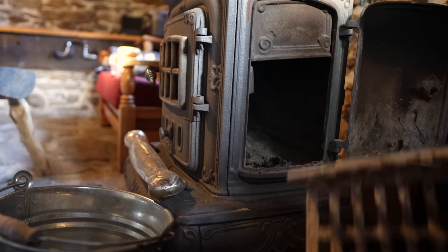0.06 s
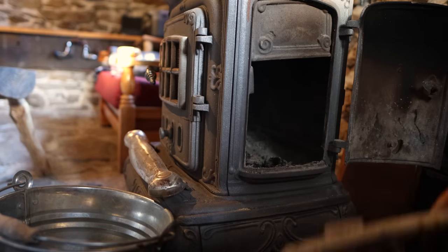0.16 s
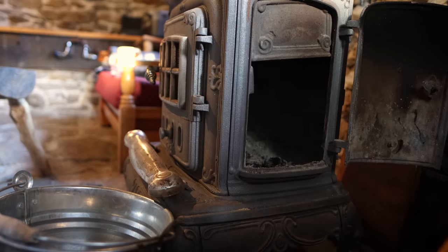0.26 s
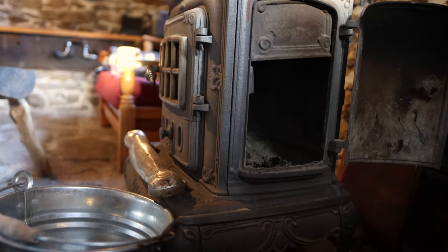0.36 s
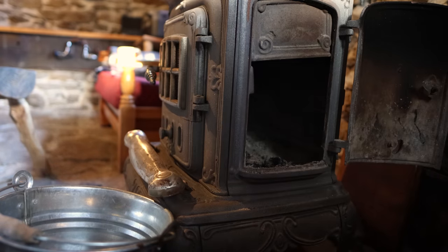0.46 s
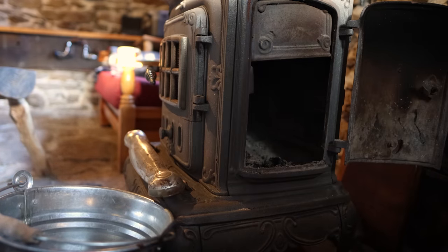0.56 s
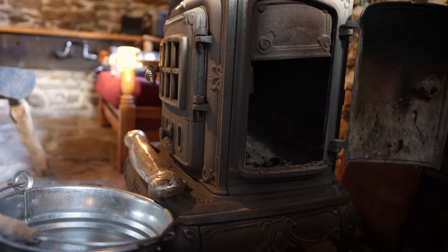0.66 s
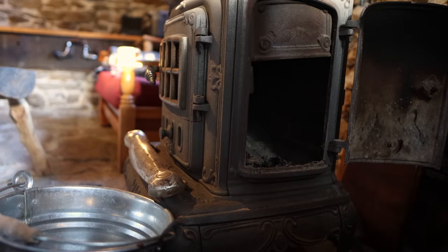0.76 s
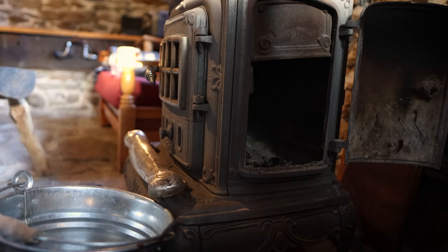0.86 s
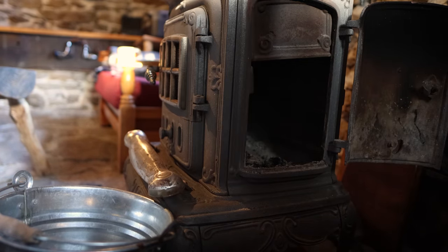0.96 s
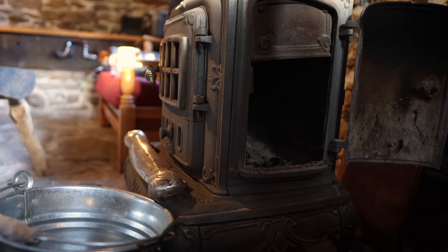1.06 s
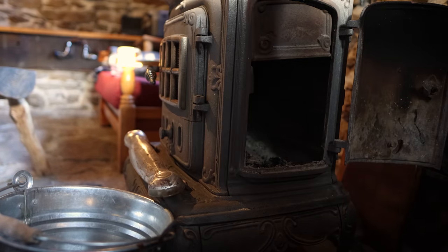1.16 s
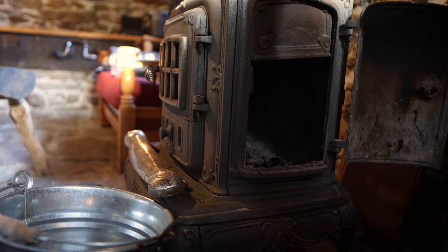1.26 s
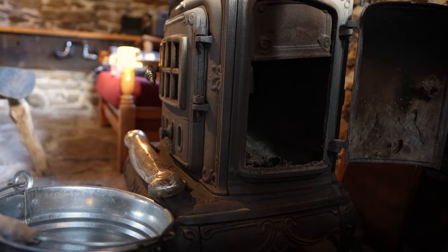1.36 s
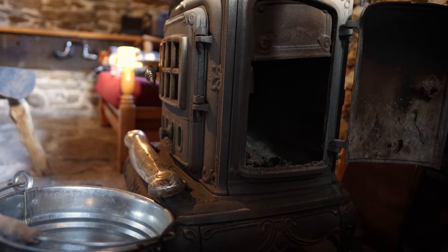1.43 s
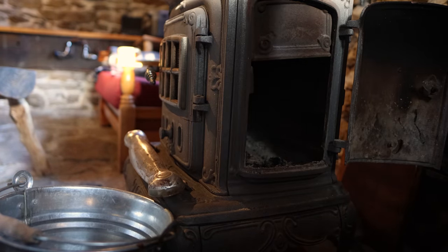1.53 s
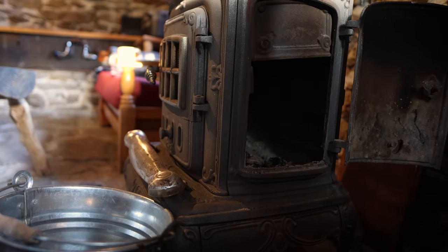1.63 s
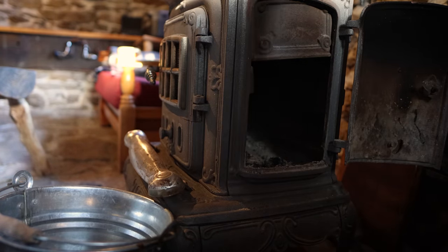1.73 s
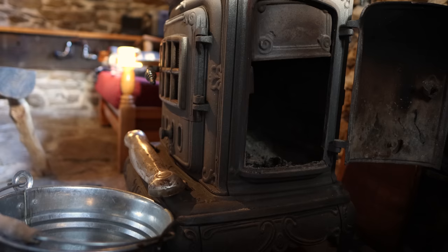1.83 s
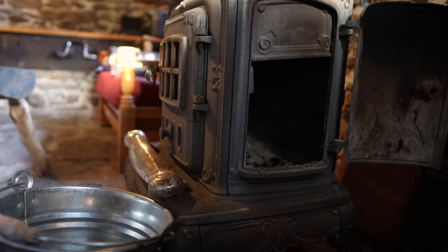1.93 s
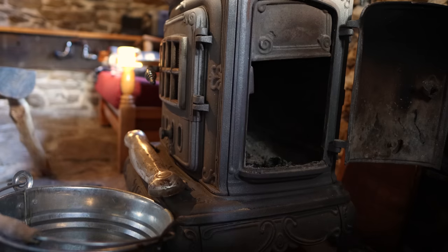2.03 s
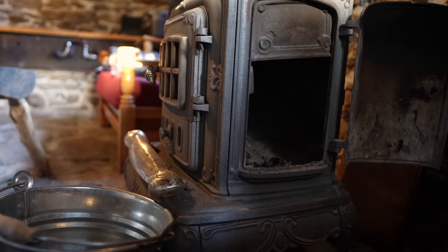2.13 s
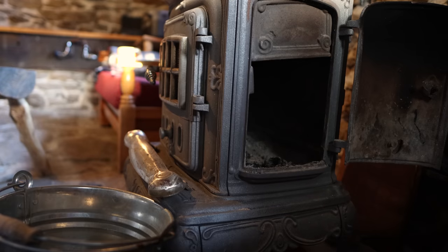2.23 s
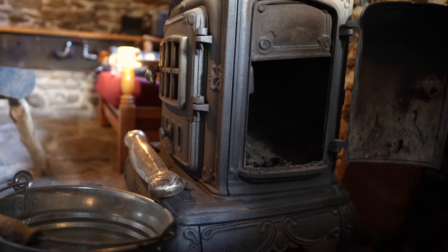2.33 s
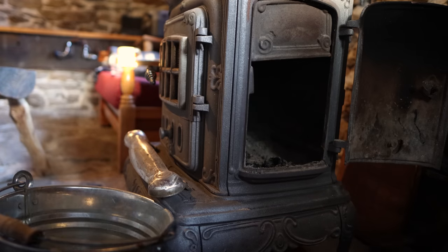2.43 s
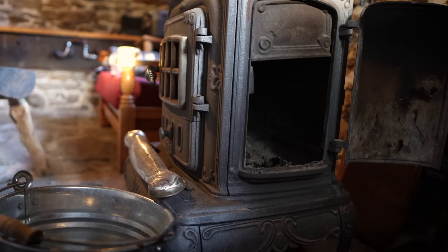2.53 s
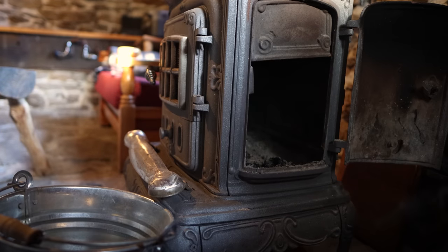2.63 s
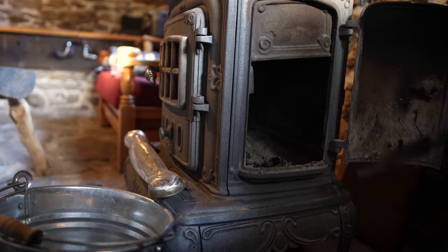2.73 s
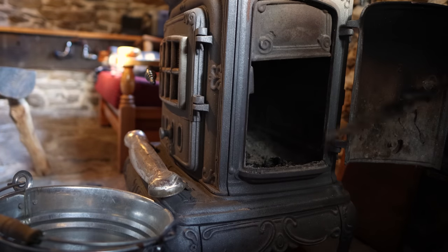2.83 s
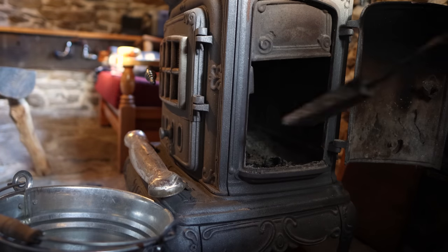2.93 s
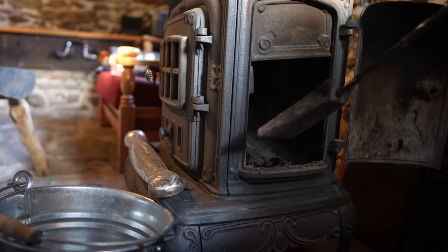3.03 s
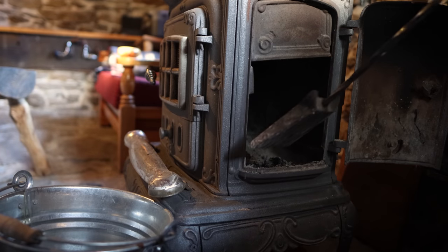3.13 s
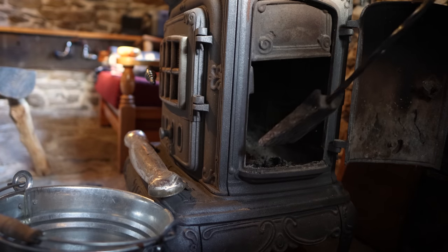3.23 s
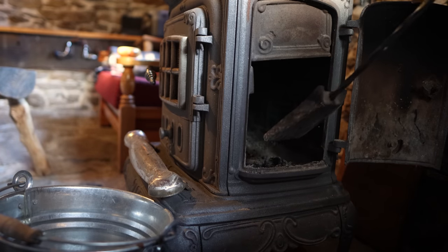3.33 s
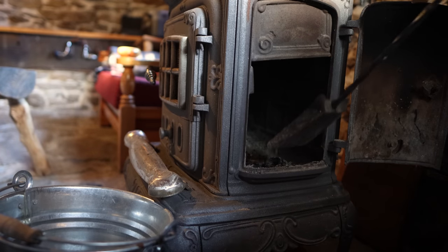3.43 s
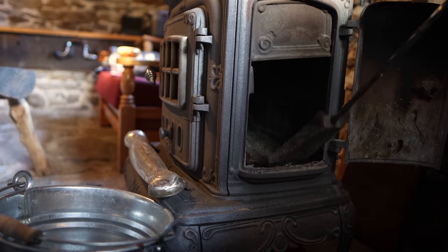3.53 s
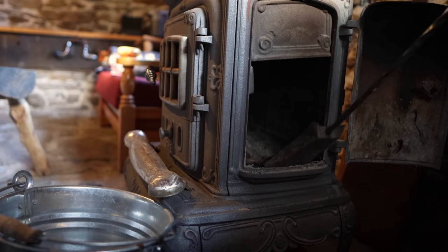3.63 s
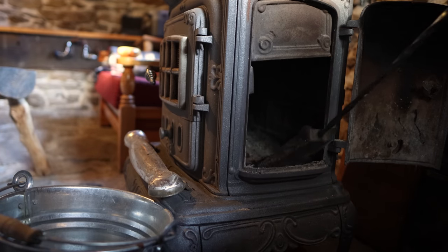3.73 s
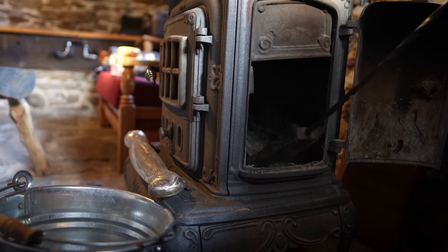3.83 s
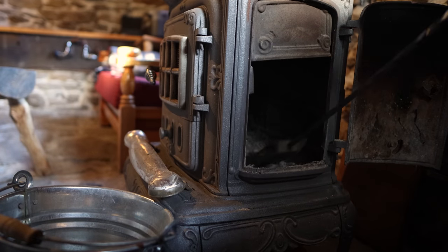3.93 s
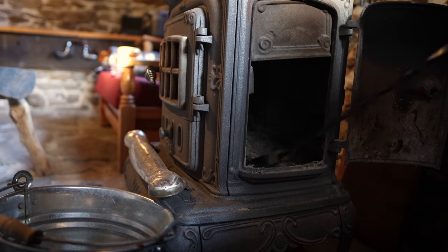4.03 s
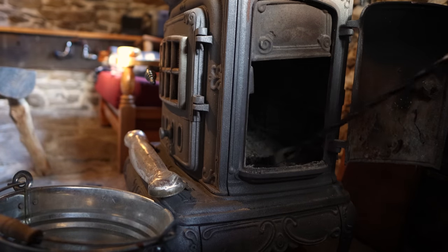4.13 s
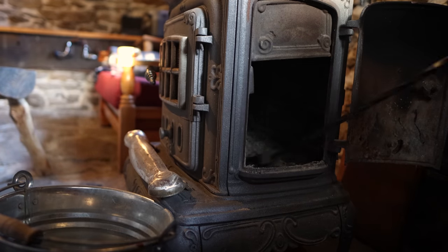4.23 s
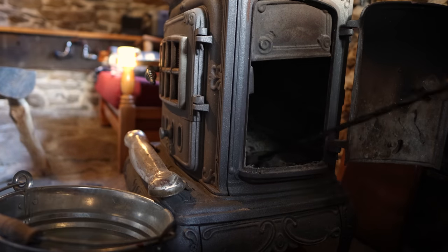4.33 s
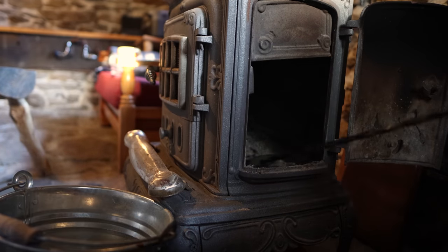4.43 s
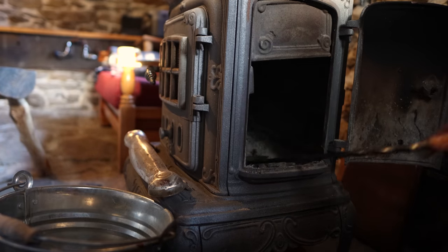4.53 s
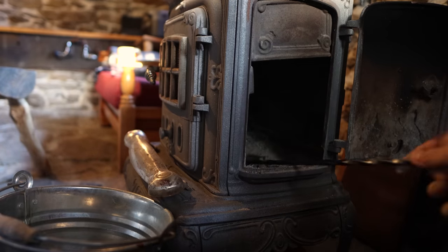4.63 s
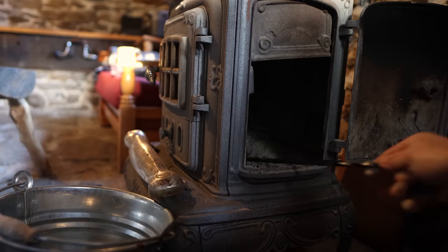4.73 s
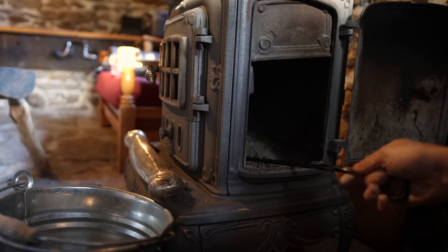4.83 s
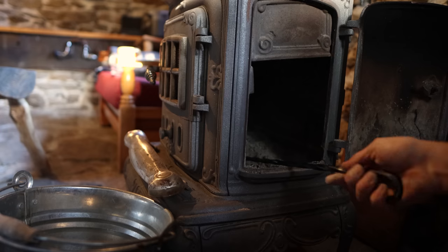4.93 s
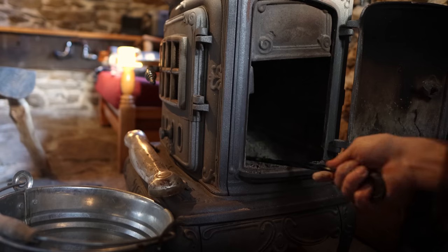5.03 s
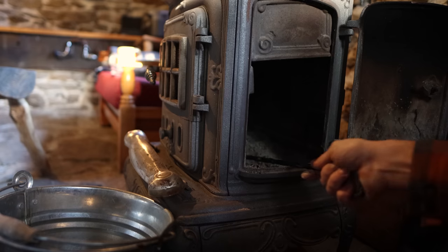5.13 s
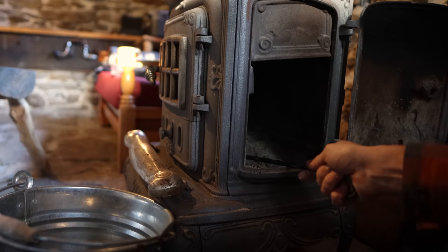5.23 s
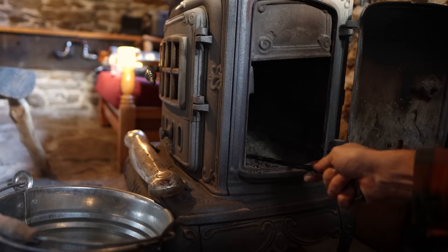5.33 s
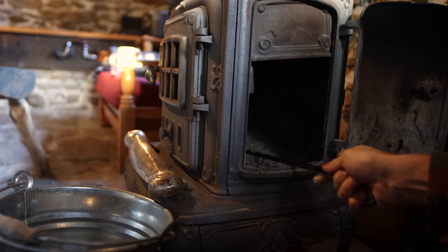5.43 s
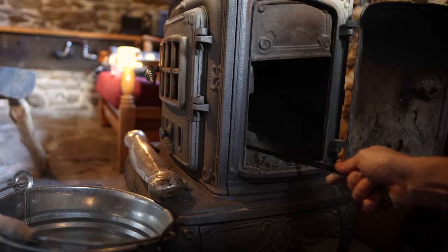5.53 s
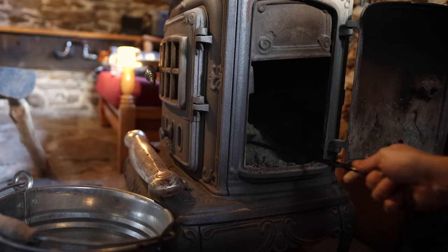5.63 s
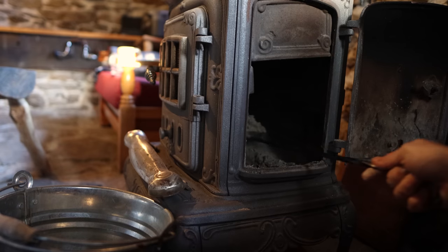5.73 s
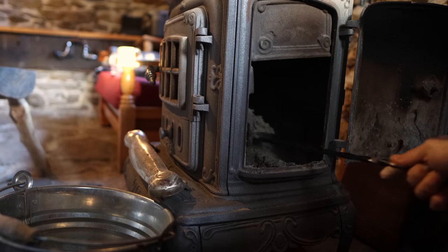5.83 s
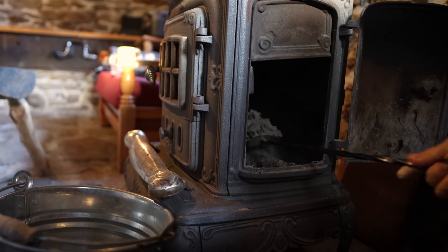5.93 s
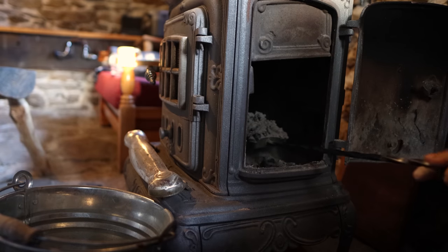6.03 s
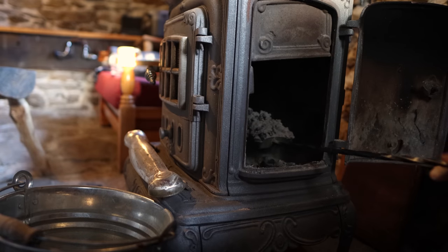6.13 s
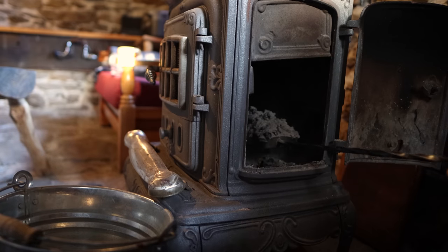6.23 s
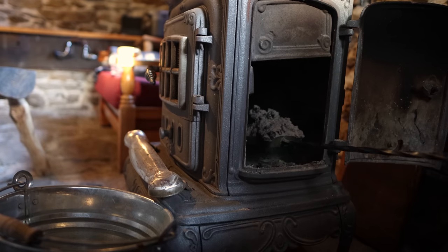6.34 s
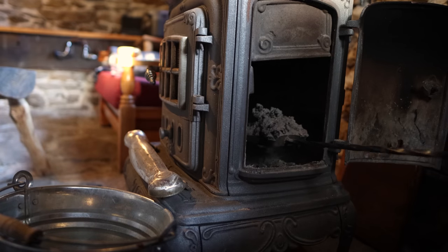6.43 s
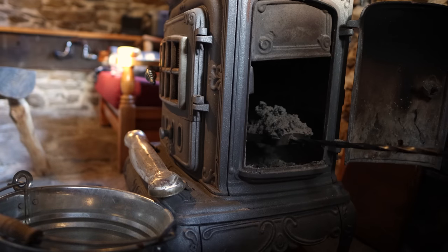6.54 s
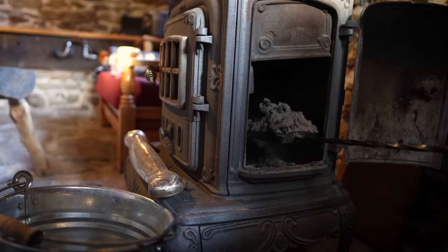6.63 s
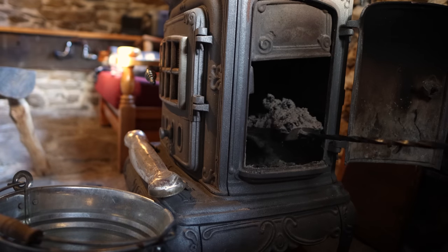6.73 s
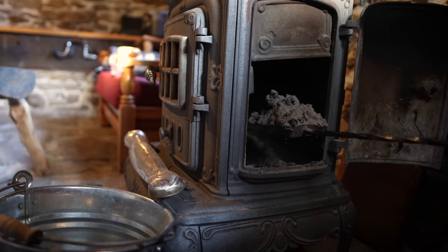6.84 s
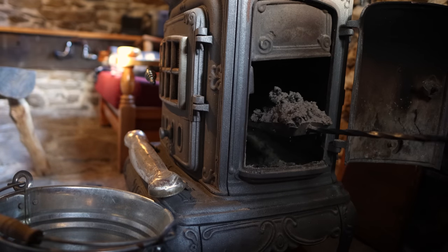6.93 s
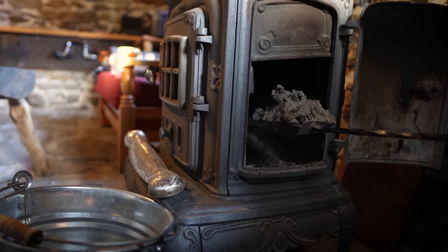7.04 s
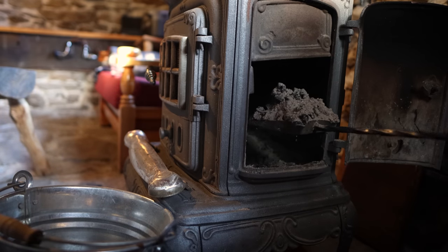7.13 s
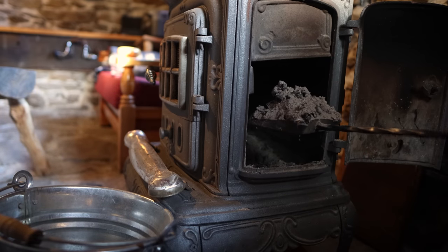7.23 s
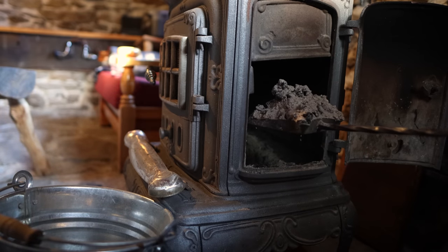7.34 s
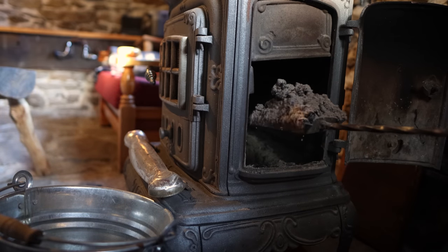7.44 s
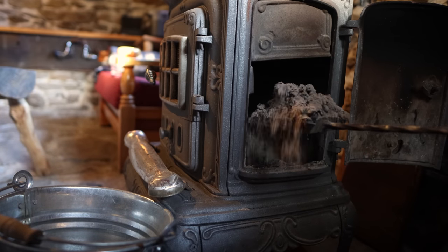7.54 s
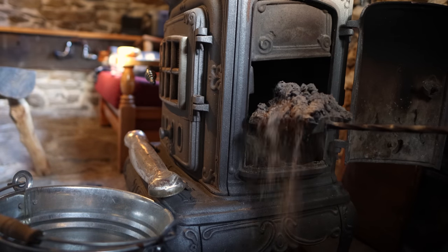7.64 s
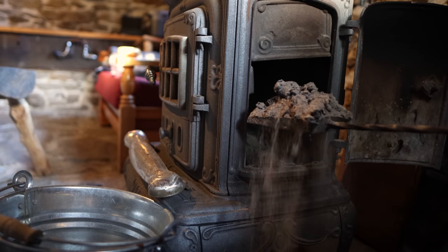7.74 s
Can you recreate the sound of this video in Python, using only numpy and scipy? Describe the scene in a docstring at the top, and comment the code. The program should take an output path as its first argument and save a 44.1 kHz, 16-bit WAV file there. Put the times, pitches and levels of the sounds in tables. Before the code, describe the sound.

Soft rustling in a quiet cabin, then an iron grate drags and rattles down onto a stone hearth. A steel shovel jangles against fire irons with a bright clang that rings briefly. It clacks into a cast-iron stove, scrapes through gritty ash in several short hollow pushes, bumps the iron, then lifts out almost silently until one last dull clunk. Close microphone, short room reverberation.

```python
"""Clearing the ash from a stove

The ash is cleared from a cast-iron stove in a small cabin, heard from close by. A grate is set down on the hearth,
and a steel shovel clangs against the fire irons as it is picked up: impacts excite decaying modes.
The shovel knocks into the firebox, scrapes through the ash in several pushes and bumps the door frame on its
way out: random friction slips drive the iron bodies. Room noise and rustling are noise shaped in bands."""
import sys
import numpy as np
from scipy import signal
from scipy.fft import irfft
from scipy.io import wavfile

SR = 44100
rng = np.random.default_rng(int(sys.argv[2]) if len(sys.argv) > 2 else 0)


def output_pcm(signal):
    """Save a mono or channel-first signal as 16-bit PCM at the path in sys.argv[1].

    Samples are clipped to [-1, 1] before scaling.
    """
    pcm = np.clip(np.atleast_2d(signal).T, -1, 1) * 32767
    wavfile.write(sys.argv[1], SR, np.round(pcm).astype(np.int16))


N = 343098
EDGES_HZ = np.geomspace(30, 18000, 25)
BANDS_HZ = np.sqrt(EDGES_HZ[1:] * EDGES_HZ[:-1])

# Colour tables are relative spectra; levels of single events are relative to their later mix gains.
# spectrum of contacts on the hearth: frequency_hz, density_db (per Hz)
HEARTH_COLOUR = [(50, -23), (205, 1), (285, -8.5), (460, 6), (740, -19.5), (1020, -2), (2400, -15),
                 (4600, -12.5), (9000, -35.5), (16000, -54)]
# spectrum of steel on steel: frequency_hz, density_db (per Hz)
CLASH_COLOUR = [(150, -35.5), (1000, -17), (1400, -4), (2100, -10), (2600, -6.5), (3800, -6.5), (5400, -14),
                (9000, -25.5), (16000, -42.5)]
# spectrum of clacks in the stove: frequency_hz, density_db (per Hz)
CLACK_COLOUR = [(80, -5), (180, 1), (310, -5), (430, -20), (650, 3), (1200, 0), (2400, -2.5), (3700, -6.5),
                (5000, -19), (16000, -34)]
# spectrum of crushed ash and cinders: frequency_hz, density_db (per Hz)
ASH_COLOUR = [(3700, 3.5), (5500, 2.5), (16000, -7)]
# modes of the shovel's steel blade: pitch_hz, level_db, t60_s
SHOVEL = [(1295, -3, .25), (1331, -6, 0.26), (1748, 1, 0.24), (1783, -1, 0.3), (1821, 5, .42),
          (2198, -7, .38), (2530, 7, 0.33), (2612, -2, .22), (2829, 3.5, 0.3), (3185, -3.5, 0.32),
          (3394, 1.5, 0.48), (3541, -7, 0.3), (3715, 5.5, .3), (3779, 2.5, 0.27), (4850, 3, .24),
          (4958, -4, 0.33), (5986, -13, .2)]
# modes of the shovel's long shaft: pitch_hz, level_db, t60_s
SHAFT = [(924, -21, 1.6), (1582, -15, 1.8), (2245, -14, .45), (2389, -1, .58), (2766, -5, .48),
         (4757, -19, .5), (5402, -16, .35)]
# bending modes of the shovel's pan, pressed on the ash: pitch_hz, level_db, t60_s
PAN = [(436.3, 6, 0.12), (457, -19.5, 1.0), (467, -2.5, 0.083), (570, -4, 0.033), (987, -11.5, 0.23)]
# modes of the iron firebox: pitch_hz, level_db, t60_s
FIREBOX = [(82.3, -45.5, 2.5), (122.2, -27.5, 3.2), (161.4, -17, 1.42), (183, -6.5, 0.13), (238.5, -6, .1),
           (256, -9, 0.14), (821, -3, 0.055)]
# the blade sliding on under its own weight between pushes: start_s, length_s, pressure_db, bite_db, ash_db
SLIDES = [(3.764, 1.16, -55, -55, -56.5), (4.501, 1.29, -54, -60, -62.5), (5.901, 0.21, -63.5, -71, -72)]
# envelope of the dragged grate and of spilling ash: attack_s, build_up_db_per_s, release_db_per_s
DRAG_SHAPE = (0.016, 12, 220)
# envelope of the shovel sliding on the irons: attack_s, build_up_db_per_s, release_db_per_s
JANGLE_SHAPE = (0.012, 51, 350)


def from_db(db):
    """Level to amplitude: 20 dB is a factor of ten."""
    return 10 ** (np.asarray(db) / 20)


def rms_one(x):
    """Normalise the mean power: scale to rms 1."""
    return x / np.sqrt(np.mean(x ** 2) + 1e-20)


def energy_one(x):
    """Unit-energy impulse response: white noise keeps its power when convolved with it."""
    return x / np.linalg.norm(x)


def at_bands(points):
    """Interpolate a table over logarithmic frequency at the band centres."""
    hz, value = np.transpose(points)
    return np.interp(np.log(BANDS_HZ), np.log(hz), value)


def fade(t60, size):
    """Exponential damping: the amplitude loses 60 dB in t60 seconds."""
    return np.exp(-np.log(1000) * np.arange(size) / SR / np.maximum(t60, 1e-3))


def add(out, s, sound):
    """Superposition: mix a sound in at time s."""
    start = max(round(s * SR), 0)
    out[start:start + len(sound)] += sound[:N - start]


def through(x, response):
    """Linear response of a body or a room, by convolution."""
    return signal.fftconvolve(x, response)[:N]


def noise_bands(size):
    """Band-pass filtering of white noise; neighbouring bands draw on independent noises."""
    white = rng.standard_normal((2, size + SR // 4))
    bands = []
    for k, pair in enumerate(zip(EDGES_HZ, EDGES_HZ[1:])):
        sos = signal.butter(2, pair, "band", fs=SR, output="sos")
        bands.append(signal.sosfilt(sos, white[k % 2])[-size:])   # the filter's onset is left out
    return np.array(bands)


def dense_modes(colour_db, t60, count=600, size=SR // 2):
    """High modal density: many modes at chance pitches follow a colour; rms 1 before onset and decay."""
    places = (np.arange(count) + rng.random(count)) / count
    hz = 50 * (17000 / 50) ** places
    heights = from_db(np.interp(np.log(hz), np.log(BANDS_HZ), colour_db))
    heights = heights * np.sqrt(hz)   # high modes lie further apart
    phasors = rng.standard_normal(count) + 1j * rng.standard_normal(count)
    lines = np.zeros(size // 2 + 1, complex)
    lines[np.round(hz * size / SR).astype(int)] = heights * phasors
    contact = 1 - fade(0.0006, size)   # the surfaces take a moment to meet
    return rms_one(irfft(lines, size)) * contact * fade(t60, size)


def ring(modes, extra_db=0, longest_t60=np.inf, size=2 * SR, swings=False):
    """Modal synthesis: damped sines, shortened by a hand or ash, waxing and waning if the body swings."""
    hz, db, t60 = np.transpose(modes)
    heights = from_db(db + extra_db) * (-1) ** np.arange(len(hz))
    out = np.zeros(size)
    for height, f, t in zip(heights, hz, np.minimum(t60, longest_t60)):
        length = min(size, int(1.4 * t * SR))
        turn = 2 * np.pi * np.arange(length) / SR
        if swings:   # turns each mode towards the listener and away: 3.5 dB, at a chance rate in Hz
            height = height * from_db(3.5 * np.sin(rng.uniform(-5.76, 3.6) * turn))
        out[:length] += height * np.sin(f * turn) * fade(t, length)
    return out


def knock(colour, db, bright_db, t60, crack=1.0, crack_t60=.02, bass_hz=500, treble_hz=5500, peak_hz=None):
    """Hard impact: a brief crack over a dying clack; a sharper contact trades bass for treble."""
    treble = 1 / (1 + (treble_hz / BANDS_HZ) ** 2)
    bass = 1 / (1 + (BANDS_HZ / bass_hz) ** 2)
    colour_db = at_bands(colour) + bright_db * (treble - bass)
    if peak_hz:   # the clack centres on a pitch: 6 dB, 0.28 octaves
        colour_db = colour_db + 6 * np.exp(-(np.log2(BANDS_HZ / peak_hz) / 0.28) ** 2)
    clack = dense_modes(colour_db, t60)
    return from_db(db) * clack * (1 + crack * fade(crack_t60, len(clack)))


def slips(per_s, spread_db, size=N):
    """Stick-slip friction as a random pulse train: chance moments, uneven sizes, rms 1."""
    sizes = from_db(spread_db * np.minimum(rng.exponential(1, size), 4))
    signs = rng.choice([-1, 1], size)
    return rms_one(sizes * signs * (rng.random(size) < per_s / SR))


def favour(modes, contact_hz, focus_db):
    """Contact-point coupling: each mode loses focus_db per octave away from the favoured pitch."""
    return -focus_db * np.abs(np.log2(np.array(modes)[:, 0] / contact_hz))


def wander(per_s, spread_db, size=N):
    """Random modulation: a gain that drifts between chance levels."""
    steps = np.arange(size) / SR * per_s
    return from_db(spread_db * np.interp(steps, np.arange(size), rng.standard_normal(size)))


def cushioned(force, cut_hz):
    """Low-pass filtering by a soft layer: ash under the edge rounds off each slip."""
    sos = signal.butter(2, min(cut_hz, SR / 2 - 10), fs=SR, output="sos")
    return signal.sosfilt(sos, force)


def flexed(x, per_s=22, spread_db=.5):
    """Frequency modulation by uneven playback: changing pressure makes the pan's resonances waver in pitch."""
    position = np.cumsum(wander(per_s, spread_db, len(x)))
    return np.interp(position, np.arange(len(x)), x, right=0)


def stroke(length, shape, spent_db=50):
    """Amplitude envelope of a hand movement: it takes hold, builds up to 1 at its end, then eases off."""
    attack_s, build_db_per_s, release_db_per_s = shape
    t = np.arange(int((length + spent_db / release_db_per_s) * SR)) / SR
    slope_db_per_s = np.where(t < length, build_db_per_s, -release_db_per_s)
    return np.minimum(t / attack_s, 1) * from_db(slope_db_per_s * (t - length))


def strokes(rows, shape):
    """Superposed amplitude envelopes of a series of like movements."""
    out = np.zeros(N)
    for s, length, db in rows:
        add(out, s, from_db(db) * stroke(length, shape))
    return out


def pan_modes(s):
    """Mass loading: from 7.3 s on the pan is lifted with its ash, which lowers its modes."""
    pitch = .91 if s > 7.3 else 1
    return [(hz * pitch, db, t60) for hz, db, t60 in PAN]


def room_noise():
    """Stationary broadband noise: band noises weighted by the colour of the room."""
    # frequency_hz, density_db (per Hz)
    room_colour = [(30, -20), (70, -5), (130, -3), (450, -7.5), (900, -8.5), (1800, -19), (3800, -23.5),
                   (7000, -28.5), (16000, -36)]
    return from_db(-70) * rms_one(from_db(at_bands(room_colour)) @ noise_bands(N))


def rustling():
    """Amplitude-modulated noise: the soft rustle of someone moving about, and from 6.2 s of ash shifting on the
    blade."""
    # rustles: start_s, length_s, level_db
    rustles = [(0, 2.21, -49.5), (2.45, 0.43, -57), (3.0, 0.33, -67.5), (6.2, 2.46, -67)]
    # envelope: attack_s, build_up_db_per_s, release_db_per_s
    rustle_shape = (0.006, 3.9, 77.4)
    # frequency_hz, density_db (per Hz)
    air_colour = [(30, -27.5), (95, -15.5), (131, -8.5), (336, -11.5), (702, -12), (1960, -19.5),
                  (3980, -19.5), (16000, -49.5)]
    noise = rms_one(from_db(at_bands(air_colour)) @ noise_bands(N))
    return strokes(rustles, rustle_shape) * noise


def plate_hum():
    """Free decay of one mode: the hum of the stove's iron plates fades from the start."""
    out = np.zeros(N)
    add(out, 0, ring([(134, -50.5, 2.1)]))
    return out


def grate():
    """Friction, then impacts: the grate slides, touches the hearth bar after bar, drops flat and is nudged."""
    # dragged out and over the stone: start_s, length_s, level_db
    drags = [(0.64, 0.22, -54), (1.0, 0.15, -38), (1.645, 0.045, -36.5)]
    # contacts with the hearth: start_s, level_db, brightness_db, touching_bar_pitch_hz
    hearth_knocks = [(0.983, -25.5, 7.5, 4680), (1.013, -36.5, -5, 6600), (1.030, -22.5, 5, 4060),
                     (1.074, -29, 1, 3980), (1.104, -33, -0.5, 5100), (1.134, -33.5, -2.5, 3700),
                     (1.203, -11.5, 1.5, 4880), (1.268, -32, 1.5, 4100), (1.636, -42, -8.5, 4307)]
    # modes of the cast-iron grate: pitch_hz, level_db, t60_s
    grate_modes = [(980, -2.5, 0.072), (1110, -3, 0.06)]
    friction = strokes(drags, DRAG_SHAPE) * slips(per_s=1500, spread_db=3.0)
    out = through(friction, energy_one(dense_modes(at_bands(HEARTH_COLOUR), t60=0.01)))
    for s, db, bright_db, bar_hz in hearth_knocks:
        modes = grate_modes + [(bar_hz, bright_db - 10, .11)]   # a sharper touch wakes the bar more
        uneven_db = rng.normal(0, 2, len(modes))
        add(out, s, knock(HEARTH_COLOUR, db - 3.5, bright_db, t60=0.19, crack=1.9, crack_t60=.03))
        add(out, s, from_db(db - 2.0) * ring(modes, uneven_db, size=SR // 2))
    return out


def sliding_on_irons():
    """Friction-driven resonance: the shovel brushes and slides over the other irons, which ring along."""
    # light brushes that set the shovel singing: start_s, length_s, level_db
    brushes = [(1.787, .05, -51.5), (3.04, 0.049, -59.5), (3.93, .07, -42)]
    # sliding off its hook and brushing the other irons: start_s, length_s, level_db
    jangles = [(1.975, 0.145, -20), (2.215, 0.026, -25)]
    irons = energy_one(dense_modes(at_bands(CLASH_COLOUR), t60=0.16, count=220))
    blade = energy_one(ring(SHOVEL, longest_t60=0.15, size=len(irons)))
    # a light touch favours the high modes
    high_db = favour(SHOVEL, 4200, focus_db=9.5)
    grazed = energy_one(ring(SHOVEL, high_db, longest_t60=0.23, size=len(irons)))
    chatter = slips(per_s=250, spread_db=5.5)
    out = through(strokes(jangles, JANGLE_SHAPE) * chatter, from_db(-2.0) * irons + from_db(-4.0) * blade)
    return out + through(strokes(brushes, JANGLE_SHAPE) * chatter, grazed + irons)


def rocking_stand():
    """Impact and modal decay: the tool stand rocks as the shovel is gripped, then settles."""
    # start_s, level_db
    stand_bumps = [(1.928, -22), (2.186, -41)]
    # modes of the tool stand: pitch_hz, level_db, t60_s
    stand_modes = [(334, -3, 0.38), (615, 1.5, 0.22), (1000, 2.5, 0.23)]
    out = np.zeros(N)
    for s, db in stand_bumps:
        add(out, s, from_db(db) * ring(stand_modes))
        add(out, s, knock(HEARTH_COLOUR, db - 4.5, 1.5, t60=0.25, crack=0.24))
    return out


def clang(focus_db=7, uneven_db=2):
    """Repeated impact of steel on steel: each contact favours some blade modes; the swinging shaft rings on."""
    # start_s, level_db, favoured_pitch_hz, shaft_level_db
    clangs = [(1.972, -11.5, 3450, -15), (1.995, -17.5, 3334, -28.5), (2.045, -16, 1760, -27.5),
              (2.066, -16.5, 1736, -34.5), (2.106, -20, 4020, -29), (2.237, -39, 1770, -53),
              (2.263, -42, 2330, -27.5)]
    out = np.zeros(N)
    for s, db, contact_hz, shaft_db in clangs:
        strengths_db = favour(SHOVEL, contact_hz, focus_db) + rng.normal(0, uneven_db, len(SHOVEL))
        add(out, s, from_db(db - 2.5) * ring(SHOVEL, strengths_db))
        add(out, s, from_db(shaft_db) * ring(SHAFT, swings=True))
        add(out, s, from_db(db + 1.0) * dense_modes(at_bands(CLASH_COLOUR), t60=0.14))
    return out


def stove_knocks():
    """Impact on coupled bodies: each bump clacks and sets firebox, pan and shaft ringing."""
    # start_s, clack_level_db, brightness_db, clack_t60_s, clack_pitch_hz, firebox_and_pan_level_db,
    # favoured_pitch_hz
    knocks = [(3.679, -28.5, 7, 0.3, 1230, -72, 707), (3.691, -25, 11, 0.24, 2120, -40, 600),
              (3.727, -31.5, 19, 0.046, 2410, -47, 790), (4.042, -30, 31, 0.2, 3250, -36.5, 453),
              (4.946, -23, -8, 0.22, 1880, -30.5, 197), (5.081, -29, 13, 0.088, 3760, -43.5, 400),
              (5.175, -23, -3, 0.32, 1920, -50, 800), (5.369, -35.5, -9.5, 0.33, 850, -41, 101.4),
              (5.766, -31.5, 1, 0.069, 1390, -38.5, 170), (7.506, -28.5, 1.5, 0.18, 610, -26, 353)]
    out = np.zeros(N)
    shaft = ring(SHAFT, longest_t60=0.3155)
    for s, db, bright_db, t60, clack_hz, ring_db, contact_hz in knocks:
        modes = FIREBOX + pan_modes(s)
        clack = knock(CLACK_COLOUR, db, bright_db, t60, crack=0.22, crack_t60=0.028, bass_hz=705,
                      peak_hz=clack_hz)
        add(out, s, clack)
        add(out, s, from_db(ring_db) * ring(modes, favour(modes, contact_hz, focus_db=2.0)))
        add(out, s, from_db(db + bright_db / 2 - 23.5) * shaft)
    return out


def scrape(s, length, pressure_db, bite_db, ash_db, shape, size=3 * SR):
    """Friction-driven resonance: the edge judders, shaking firebox, floor, pan and blade, and ash crunches."""
    # floor plate under the blade: frequency_hz, density_db (per Hz)
    floor_colour = [(120, -44), (185, 11), (330, -12.5), (480, 2.5), (800, -7), (1600, -7.5), (5000, -54)]
    # scraping edge: frequency_hz, density_db (per Hz)
    edge_colour = [(300, -41), (600, 0), (1000, -3.5), (1700, 4.5), (2400, -8.5), (3600, 2.5), (4500, -10),
                   (7000, -8.5), (16000, -36)]
    # modes of the blade with its edge pressed on the iron floor: pitch_hz, level_db, t60_s
    pressed_blade = [(1328, 0.5, 0.18), (1916, -0.5, .14), (2594, 7.5, 0.081), (3660, 0.5, 0.11)]
    effort = np.zeros(size)
    gain = stroke(length, shape)[:size]
    effort[:len(gain)] = gain
    catching = wander(per_s=110, spread_db=0.5, size=size)   # the edge catches on cinders and lets go
    judder = effort * rms_one(catching * slips(per_s=450, spread_db=3.5, size=size)) + 1e-18
    crunch = effort * rms_one(catching * slips(per_s=2900, spread_db=-0.5, size=size))
    # brief slips carry little bass
    shake = signal.sosfilt(signal.butter(4, 165, "high", fs=SR, output="sos"), judder)
    boom = from_db(-4.5) * through(shake, energy_one(ring(FIREBOX)))
    boom += from_db(-1.5) * flexed(through(shake, energy_one(ring(PAN))))
    floor = from_db(-7.5) * energy_one(dense_modes(at_bands(floor_colour), t60=0.096))
    edge = from_db(2.5) * energy_one(dense_modes(at_bands(edge_colour), t60=0.1))
    grip_db = rng.normal(0, 3, len(pressed_blade))   # each scrape meets the floor at another angle
    blade = from_db(-7.0) * energy_one(ring(pressed_blade, grip_db, size=len(edge)))
    crumb = energy_one(dense_modes(at_bands(ASH_COLOUR), t60=0.025))
    # ash piles up on the blade and cushions later scrapes more: 1.52 octaves per second below 8 kHz
    cut_hz = 8000 * 2 ** (-1.52 * (s - SLIDES[0][0]))
    out = np.zeros(N)
    add(out, s, from_db(pressure_db) * boom)
    add(out, s, from_db(pressure_db) * through(shake, floor))
    add(out, s, from_db(bite_db) * through(cushioned(judder, cut_hz), edge + blade))
    add(out, s, from_db(ash_db) * through(crunch, crumb))
    return out


def shovelling():
    """Superposed friction strokes: light slides through the ash, with a series of firm pushes on top."""
    # start_s, length_s, pressure_db, bite_db, ash_db
    pushes = [(3.933, 0.078, -45.5, -61, -41), (4.026, 0.04, -34, -39, -39.5),
              (4.313, 0.07, -19.5, -18.5, -30.5), (4.463, 0.011, -33.5, -32.5, -69),
              (4.543, 0.098, -21, -25, -42), (4.75, 0.097, -20.5, -27.5, -42), (5.082, 0.12, -27, -29, -43),
              (5.37, 0.081, -40.5, -36.5, -81)]
    # envelopes: attack_s, build_up_db_per_s, release_db_per_s
    push_shape = (0.017, 60, 214)
    slide_shape = (0.07, 0.28, 59)
    light = sum(scrape(*slide, slide_shape, size=3 * SR) for slide in SLIDES)
    firm = sum(scrape(*push, push_shape, size=2 * SR) for push in pushes)
    return light + firm


def cinder_snaps():
    """Brittle fracture as short impacts: cinders snap under the blade."""
    # start_s, level_db
    cinders = [(4.282, -45), (5.459, -51), (5.532, -54), (5.7, -54), (5.845, -45.5), (5.983, -52),
               (6.051, -53.5)]
    out = np.zeros(N)
    for s, db in cinders:
        add(out, s, knock(ASH_COLOUR, db, 0, t60=0.043, crack=0.44, crack_t60=0.0094))
    return out


def edge_catches():
    """Sudden release: the edge catches on a lump and jumps free, which jolts the pan's modes."""
    # start_s, level_db
    catches = [(4.325, -30), (4.384, -18), (4.563, -27), (4.637, -24), (4.664, -36), (4.803, -27),
               (6.053, -50.5), (6.512, -60.5)]
    out = np.zeros(N)
    for s, db in catches:
        add(out, s, knock(CLACK_COLOUR, db, 4, t60=0.05, crack=0))
        add(out, s, from_db(db - 3.0) * ring(pan_modes(s)))
    return out


def spill():
    """Granular impacts, band-passed: fine ash spills off the jolted shovel onto the hearth."""
    # start_s, length_s, level_db
    spills = [(7.69, 0.12, -70)]
    # pass band: low_hz, high_hz
    grain_band = (2000, 4900)
    sos = signal.butter(2, grain_band, "band", fs=SR, output="sos")
    grains = signal.sosfilt(sos, slips(per_s=2590, spread_db=4))
    return strokes(spills, DRAG_SHAPE) * rms_one(grains)


def cabin(x, first_echo_s=0.0082):
    """Diffuse reverberation: a short noise tail off stone and timber, longer in the bass."""
    # frequency_hz, t60_s
    cabin_t60 = [(100, 0.71), (2000, 0.37), (14000, 0.19)]
    # frequency_hz, reverberation_db
    cabin_db = [(100, -6), (3000, -10.5), (14000, -19.5)]
    tail = np.zeros(SR)
    for band, gain, t60 in zip(noise_bands(SR), from_db(at_bands(cabin_db)), at_bands(cabin_t60)):
        tail += gain * band * energy_one(fade(t60, SR))
    return through(x, tail * (np.arange(SR) / SR > first_echo_s))


def scene(radiation_hz=75):
    """Radiation limit: ironwork too small to radiate deep bass, with its reverberation and the room's air."""
    air = room_noise() + rustling() + plate_hum()
    iron = grate() + sliding_on_irons() + rocking_stand() + clang()
    iron = iron + stove_knocks() + shovelling() + cinder_snaps() + edge_catches() + spill()
    iron = signal.sosfilt(signal.butter(4, radiation_hz, "high", fs=SR, output="sos"), iron)
    return (iron + cabin(iron) + air)[None]


def record(dry):
    """Saturation and band limiting: the loudest peaks overload softly; the top is cut at 16.3 kHz."""
    clipped = dry / (1 + (dry / .92) ** 6) ** (1 / 6)
    return signal.sosfilt(signal.ellip(12, .1, 80, 16300, fs=SR, output="sos"), clipped)


dry = scene()
out = record(dry)
output_pcm(out)
```